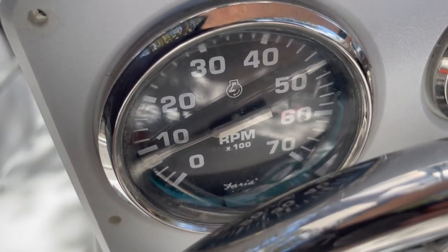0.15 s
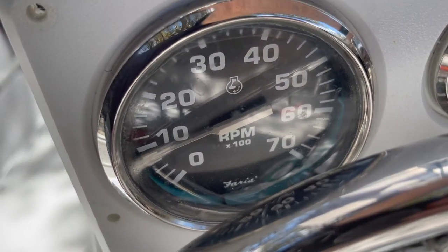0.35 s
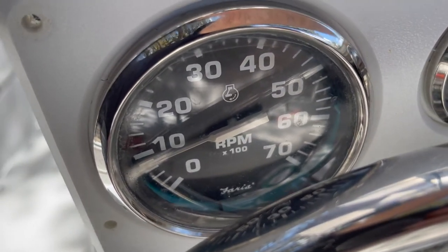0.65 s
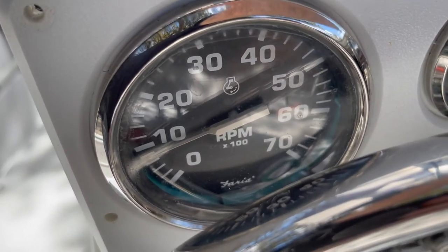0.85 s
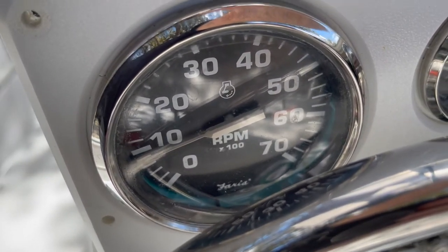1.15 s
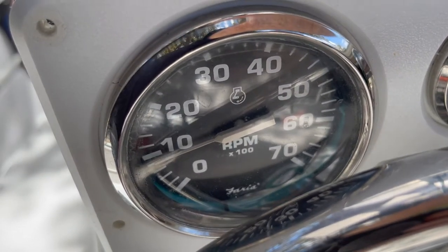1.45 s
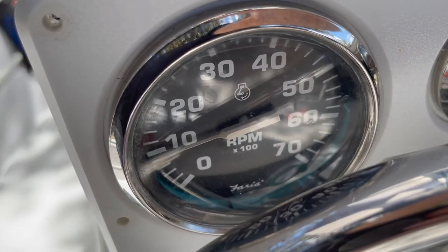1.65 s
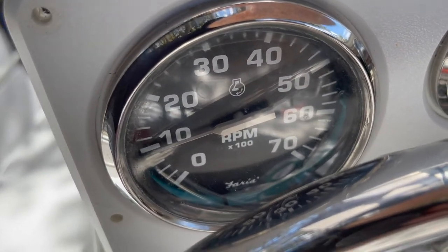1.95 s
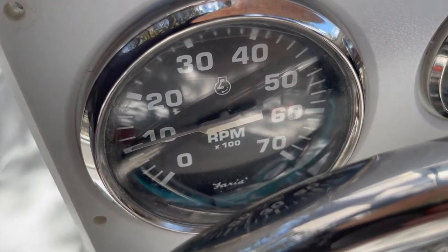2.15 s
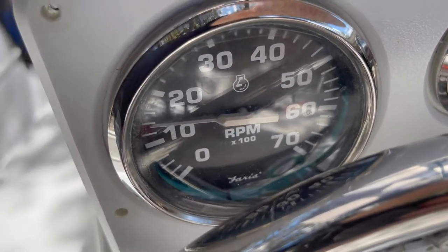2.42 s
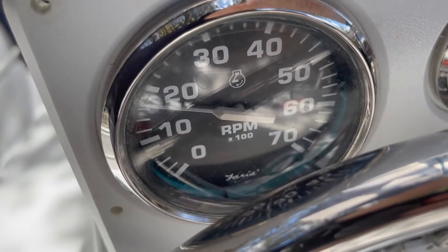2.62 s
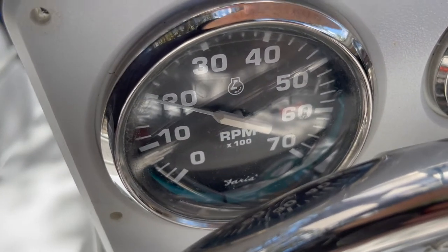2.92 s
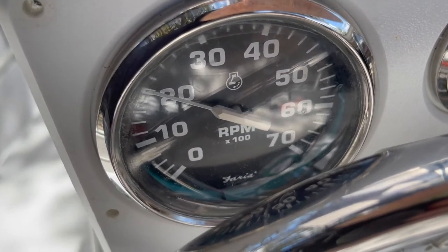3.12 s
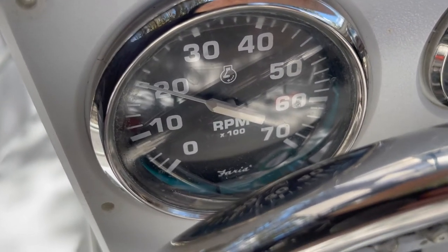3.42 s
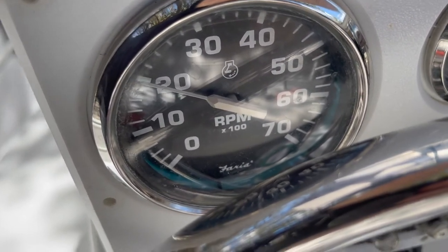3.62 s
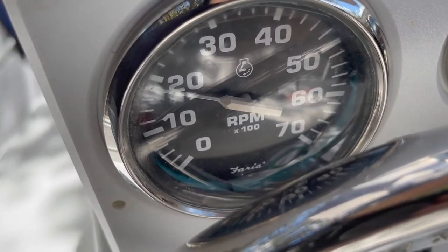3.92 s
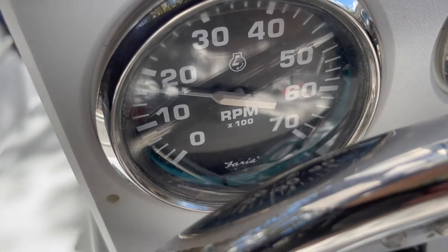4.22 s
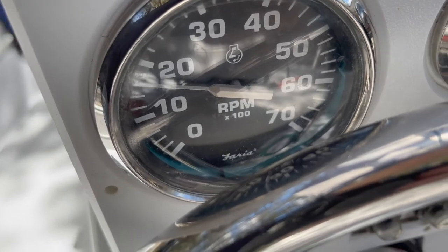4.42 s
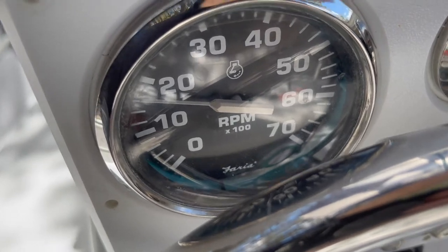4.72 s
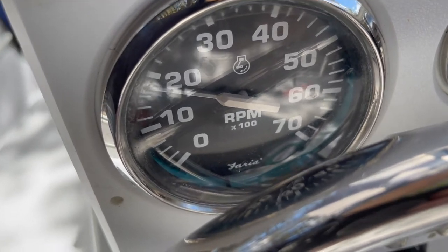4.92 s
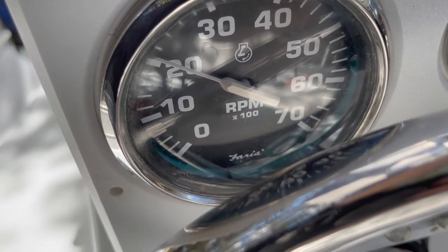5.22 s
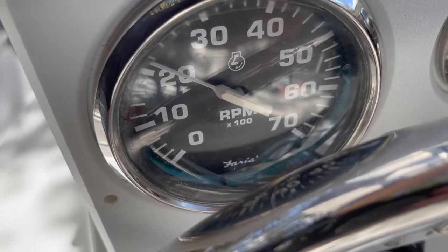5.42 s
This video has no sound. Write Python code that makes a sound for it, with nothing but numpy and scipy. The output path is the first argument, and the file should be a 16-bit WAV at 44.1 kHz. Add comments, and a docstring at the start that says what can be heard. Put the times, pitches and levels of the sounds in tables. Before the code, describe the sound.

A four-stroke outboard motor idles with a lumpy burble, then is revved twice into a booming growl while cooling water hisses and spits beside it.

```python
"""At the console of a boat: a four-stroke outboard idles, misses one firing and is revved twice.
Exhaust pulses boom through the leg and hull, built from multiples of the firing rate gliding through resonances.
Noise puffed by each firing burbles at the stern; ticks at fixed crank angles clatter under the cowl.
Intake air rushes and whistles as filtered noise, and short tones squeal and sag in pitch.
Beside the boat the cooling water hisses as fine spray, and larger drops spit in short bright bursts."""
import sys
import numpy as np
from scipy import signal
from scipy.fft import rfft, irfft, next_fast_len
from scipy.io import wavfile

SR = 44100
rng = np.random.default_rng(int(sys.argv[2]) if len(sys.argv) > 2 else 0)


def master(y):
    """Save y as 16-bit WAV."""
    cut = np.clip(np.atleast_2d(y).T, -1, 1)
    pcm = np.round(cut * 32767)  # scale
    wavfile.write(sys.argv[1], SR, pcm.astype(np.int16))


N = 245681
TIME = np.arange(N) / SR
SIZE = next_fast_len(N, True)
BINS = np.fft.rfftfreq(SIZE, 1 / SR)
CIRCLE = abs(np.fft.fftfreq(2 ** 14, 1 / SR))  # full frequency circle of the resonant bodies [Hz]
CRUISE_HZ = 50  # firing rate at which the cruise levels below hold

# engine speed, two firings a crank turn: (time [s], firing rate [Hz])
SPEED = [(0.0, 24.97), (0.25, 25.16), (0.53, 24.76), (0.8, 27.8), (1.4, 30.89), (1.89, 33.14), (2.0, 39.51),
         (2.1, 41.99), (2.25, 56.8), (2.38, 71.15), (2.51, 79.73), (2.6, 79.5), (2.72, 76.06), (3.0, 68.14),
         (3.25, 63.13), (3.58, 57.16), (3.77, 52.44), (4.05, 50.25), (4.37, 45.74), (4.56, 57),
         (4.67, 59.38), (4.82, 70.27), (4.95, 78.85), (5.12, 79.93), (5.42, 73.74), (5.57, 71.09)]
# first multiples of the firing rate in one exhaust pulse: (level [dB])
PULSE = [0, 0, -4.5, -3.5, -6.5]
# resonances of the cowl's panels: (centre [Hz], width [Hz], left lift [dB], right lift [dB])
PANELS = [(1028.7, 23.4, 13.6, 8), (1115, 27, 14.5, 8.5), (1210, 21, 11.8, -4), (1483, 25, 8.7, -28),
          (1711, 42, 13.3, 10), (1784, 55, 5, 9), (1873, 33, 16, 1), (1975, 67, 6.1, 6), (2350, 31, 4.2, 8),
          (2745, 14, 11, 8), (3147, 68, 10.24, 10.5), (3830, 24, 6.2, -21)]
# how exhaust, stern and hull, valve train, intake air and water follow the engine, before each part's trim:
# (level at cruise [dB], rise with speed [dB per octave], rise at open throttle [dB])
BOOM_LEVEL = (0, 4.84, 0.6)
STERN_LEVEL = (-36, 7.8, 0.99)
CLATTER_LEVEL = (-41, 5.85, 2.3)
RUSH_LEVEL = (-53, 3.3, 7.9)
WATER_LEVEL = (-45.5, 1.76, 1.2)


def amp(db):
    """Decibels to gain."""
    return 10 ** (np.asarray(db) / 20)


def unit(x):
    """Scales to rms 1."""
    return x / np.sqrt(np.mean(x ** 2) + 1e-20)


def curve(rows):
    """The second column of a time table at every sample."""
    times, values = np.transpose(rows)
    return np.interp(TIME, times, values)


def read(points, hz):
    """A spectrum table on a log-frequency axis."""
    f, value = np.transpose(points)
    return np.interp(np.log(hz + 1), np.log(f), value)


def smooth(x, seconds):
    """Moving sum under a bell window."""
    return signal.oaconvolve(x, signal.windows.hann(int(seconds * SR) | 1), "same")


def wander(seconds):
    """Slow random drift of rms 1."""
    return unit(smooth(rng.standard_normal(N), seconds))


def exhaust(firings, balance_db=0.5, spread=0.79):
    """The firings' lowest multiples glide through the resonances of the exhaust passage; one firing drops out."""
    # exhaust passage, whose ringing colours and delays each multiple: (frequency [Hz], gain [dB])
    pipe = [(20, -82), (27, -70), (32, -28), (44, -27.5), (55, -12), (65, -14.5), (78, -13), (100, -15),
            (120, -20.5), (142, -18.5), (163, -41.5), (182, -30), (203, -39.5), (228, -25), (255, -37.5),
            (285, -43.5), (315, -26), (345, -31.5), (400, -28.5), (750, -65.5)]
    # a firing that fails: (middle [s], share of the boom lost [0-1], half length [s])
    misfire = (1.883, 1, 0.017)
    uneven, uneven_s = 0.1, 0.07  # strokes differ at the slowest idle: rms share, bell length [s]

    passage, speed, boom = causal(read(pipe, CIRCLE)), curve(SPEED), np.zeros((2, N))
    for k, db in enumerate(PULSE, 1):
        hz = k * speed
        line = amp(db) * sweep(passage, hz) * np.exp(2j * np.pi * k * firings)
        # the microphone ports differ more at short wavelengths
        apart = np.exp(0.5j * spread * (hz / 320) ** 1.6)
        boom += np.array([line * apart, line / apart]).real

    idling = (speed.min() / speed) ** 2  # combustion evens out as the engine speeds up
    strokes = 1 + uneven * idling * wander(uneven_s)
    middle, lost, half = misfire
    firing_left = 1 - lost * np.exp(-((TIME - middle) / half) ** 4)
    balance = amp([[-balance_db], [balance_db]])
    return np.sqrt(2) * boom * strokes * firing_left * amp(loudness(BOOM_LEVEL)) * balance


def hull(firings, level_db=-2, rough=0.32, scatter=1.62, fade_db=0.1, count=30):
    """Higher multiples glide through the resonances of hull and cowl and growl; each arrives by its own path."""
    # broad response of the hull: (frequency [Hz], gain [dB])
    hull_slope = [(140, 8.5), (165, 5.5), (200, -3), (280, -2), (350, 2), (470, -5.5), (530, -12.5),
                  (700, -10.5), (900, -27.5), (1400, -16.5), (1850, -28.5), (2400, -14.5)]
    # resonances of the hull: (centre [Hz], width [Hz], left lift [dB], right lift [dB])
    hull_modes = [(227.8, 13.6, 11, 13), (319, 16, 1, -12), (347, 20, 4.5, 8), (394.9, 11, 4, 11.5),
                  (462.7, 70, 2.5, 9), (603, 82, 10.5, 0.5), (835, 33, 3, 13)]

    left, right = causal(colour(CIRCLE, hull_slope, hull_modes + PANELS))
    speed, out = curve(SPEED), np.zeros((2, N))
    waver = wander(0.064) + 1j * wander(0.029)
    for k in range(len(PULSE) + 1, count):
        hz = k * speed
        growl = 1 + rough * np.roll(waver, rng.integers(N))
        line = np.exp(2j * np.pi * (k * firings + rng.random())) * growl
        apart = np.exp(1j * scatter * rng.standard_normal() * np.minimum(hz / 600, 2) ** 2)
        # gentle idling pulses hold less of the highest multiples
        soft_db = -fade_db * max(k - count / 2, 0) * speed.max() / speed
        pair = np.array([line * sweep(left, hz), line * sweep(right, hz) * apart]).real
        out += pair * amp(soft_db)
    return out * amp(loudness(STERN_LEVEL) + level_db)


def burble(firings, level_db=6, swell_db=0.5, idle_db=3):
    """Each puff of gas churns the water at the stern; it grows louder with speed, idle_db flattening the rise."""
    # gas bubbling out: (frequency [Hz], relative level [dB per Hz])
    bubbling = [(15, -19), (35, -4), (70, 11), (130, 10), (180, 2.5), (280, -1), (370, 4), (470, 1.5),
                (540, -0.5), (680, 0), (850, -11.5), (1500, -31)]
    gas = puffs(firings, depth=2.6, lag=-0.077, length=0.013)
    churn = rng.standard_normal((2, N)) * gas * amp(swell_db * wander(0.071))
    speed = curve(SPEED)
    slow = 1 - 2 * speed / speed.max()
    return unit(ports(*churn, read(bubbling, BINS))) * amp(loudness(STERN_LEVEL) + level_db + idle_db * slow)


def clatter(firings, regular=0.15, jitter_s=0.00003, level_db=2.0, count=48):
    """Valves and gears tick at the same crank angles in every turn, over a loose rattle."""
    # engine cowl: (frequency [Hz], relative level [dB per Hz])
    cowl = [(300, -7.5), (650, -4.5), (900, 3.5), (1400, 0), (2000, -4.5), (2600, -9), (3300, -11),
            (4500, -27), (9000, -41)]
    sides = []
    for side in range(2):
        angles, signs = rng.random(count), rng.choice([-1, 1], count)
        turns = np.arange(firings[-1] // 2 + 1)[:, None]
        marks = 2 * (turns + angles)  # counted in firings
        heard = (marks > firings[0]) & (marks < firings[-1])
        times = np.interp(marks[heard], firings, TIME) + jitter_s * rng.standard_normal(heard.sum())
        sizes = (signs * np.ones_like(marks))[heard]
        # more ticks a second at speed: weaken each to hold the power level
        ticks = clicks(np.clip(times, 0, TIME[-1]), sizes) / np.sqrt(curve(SPEED))
        rattle = rng.standard_normal(N)
        sides.append(np.sqrt(regular) * unit(ticks) + np.sqrt(1 - regular) * rattle)
    drive = np.array(sides) * puffs(firings, depth=1.0, lag=0.028, length=0.045)
    return unit(body(ports(*drive), cowl, PANELS)) * amp(loudness(CLATTER_LEVEL) + level_db)


def rush(level_db=5, balance_db=1.4, flutter_db=1.57):
    """Air drawn into the engine, louder with speed and with an open throttle."""
    # rush of air: (frequency [Hz], relative level [dB per Hz])
    air_slope = [(1200, -5), (2500, 3.5), (3500, -0.5), (5000, 4), (5900, 5.5), (6800, -1.5), (8500, -5),
                 (13000, -24)]
    # resonances of the intake: (centre [Hz], width [Hz], left lift [dB], right lift [dB])
    intake = [(2407, 24, 13.5, -7), (2664, 110, 10.5, -11), (3270, 47, 5, -4), (3520, 16, 16, 11),
              (3900, 45, 6.5, 8)]
    air = rng.standard_normal((2, N)) * amp(flutter_db * wander(0.033))
    coloured = unit(ports(*air, colour(BINS, air_slope, intake)))
    return coloured * amp(loudness(RUSH_LEVEL) + level_db) * amp([[balance_db], [-balance_db]])


def whistle(balance_db=2, flutter_db=3):
    """Air squeezing past the throttle sings in one narrow resonance that swells, flutters and fades."""
    # (middle [s], length [s], pitch [Hz], half width at -6 dB [Hz], level before flutter and balance [dB])
    whistles = [(0.35, 0.25, 2720, 17, -53), (1.306, 1.9, 2760, 6.1, -58.5), (1.98, 0.24, 2730, 50, -47.5),
                (4.55, 0.86, 2820, 37, -47.5)]
    out = np.zeros((2, N))
    for middle, length, hz, width_hz, db in whistles:
        peak_db = -20 * np.log10(1 + ((BINS - hz) / width_hz) ** 2)
        swell = np.cos(np.pi * np.clip((TIME - middle) / length, -0.5, 0.5))
        out += amp(db) * swell * unit(ports(*rng.standard_normal((2, N)), peak_db))
    return out * unit(amp(flutter_db * wander(0.099))) * amp([[balance_db], [-balance_db]])


def squeals(rough=0.62, balance_db=2):
    """Short tones that sag in pitch, roughened by a random wobble of phase."""
    # (start [s], length [s], first pitch [Hz], last pitch [Hz], level before balance [dB])
    falls = [(3.026, .13, 1236, 1203, -40), (4.278, .16, 2780, 2451, -49), (5.35, 0.125, 1890, 1767, -44)]
    out = np.zeros(N)
    for start, length, first_hz, last_hz, db in falls:
        progress = np.clip((TIME - start) / length, 0, 1)
        cycles = np.cumsum(first_hz + (last_hz - first_hz) * progress) / SR
        tone = np.sin(2 * np.pi * cycles + rough * wander(0.015))
        out += amp(db) * np.sin(np.pi * progress) * tone
    return np.sqrt(2) * out * amp([[balance_db], [-balance_db]])


def water(level_db=3.5, flicker_db=1.3):
    """The cooling stream breaks into fine spray: flickering noise, a little louder with speed."""
    # hiss of water: (frequency [Hz], relative level [dB per Hz])
    hiss = [(3500, -64), (5500, -5.5), (7000, -4), (8500, -2.5), (10000, 0.5), (10800, 1.5), (11400, 4),
            (12000, -7.5), (13000, -7.5)]
    spray = rng.standard_normal((2, N)) * amp(flicker_db * wander(0.057))
    return unit(ports(*spray, read(hiss, BINS))) * amp(loudness(WATER_LEVEL) + level_db)


def spits(level_db=-6, rise=0.002, decay=0.022, width_octaves=0.33):
    """Larger drops slap the surface: short bright bursts."""
    # drops that slap: (time [s], peak level before the trim level_db [dB], centre [Hz])
    drops = [(0.0662, -38, 9000), (0.2139, -37, 4800), (0.609, -43, 4350), (0.658, -39, 8560),
             (0.9416, -39, 4370), (0.9797, -37.5, 6070), (1.1623, -37.5, 5400), (1.4519, -38, 7710),
             (1.6094, -44, 8060), (1.7998, -45, 8680), (1.8896, -37, 8980)]
    out = np.zeros((2, N))
    for start, db, hz in drops:
        age = np.maximum(TIME - start, 0)
        shape = (1 - np.exp(-age / rise)) * np.exp(-np.minimum(age / decay, 40))
        band_db = -np.minimum(2 * (np.log2((BINS + 1) / hz) / width_octaves) ** 2, 60)
        burst = unit(ports(*rng.standard_normal((2, N)), band_db))
        out += amp(db + level_db) * shape / shape.max() * burst
    return out


def loudness(law):
    """A part's level in dB: it grows with speed and with the throttle."""
    # the throttle starts part open, shuts, then is opened twice and eased back: (time [s], opening [0-1])
    throttle = [(0, 0.47), (.3, 0), (1.75, 0.02), (2.03, 0.75), (2.3, 1), (2.5, 0.67), (2.8, 0), (3.5, 0),
                (4.25, 0.33), (4.65, 0.68), (4.92, 0.99), (5.3, 0.17), (5.57, .05)]
    cruise_db, octave_db, throttle_db = law
    octaves = np.log2(curve(SPEED) / CRUISE_HZ)
    return cruise_db + octave_db * octaves + throttle_db * np.clip(curve(throttle), 0, 1)


def puffs(firings, depth, lag, length):
    """A swell after every firing (lag in firings, length in s); swells run together as the engine speeds up."""
    age = ((firings - lag) % 1) / curve(SPEED)
    return unit(1 + depth * np.exp(-age / length))


def clicks(times, sizes):
    """Impulses at exact times, each shared between two samples."""
    at, part = np.divmod(times * SR, 1)
    at = at.astype(int)
    early = np.bincount(at, sizes * (1 - part), N + 1)
    late = np.bincount(at + 1, sizes * part, N + 1)
    return (early + late)[:N]


def colour(hz, slope, modes):
    """Left and right dB of a broad slope lifted by resonances."""
    lifts = sum(np.array([[left], [right]]) / (1 + (2 * (hz - f) / width) ** 2)
                for f, width, left, right in modes)
    return read(slope, hz) + lifts


def causal(db):
    """The minimum-phase response that rings only after the blow, from dB on the full frequency circle."""
    return np.exp(np.conj(signal.hilbert(np.log(amp(db)))))


def sweep(response, hz):
    """A complex response read along a moving frequency."""
    half = len(CIRCLE) // 2
    return np.interp(hz, CIRCLE[:half], response[:half])


def body(x, slope, modes):
    """Rings x through a resonant body, one response for each port."""
    ring = np.fft.ifft(causal(colour(CIRCLE, slope, modes))).real[:, :len(CIRCLE) // 2]
    return signal.fftconvolve(x, ring, axes=1)[:, :N]


def ports(a, b, db=0):
    """Two unrelated signals become a partly alike left and right microphone port, coloured by db."""
    # how alike the ports are: (frequency [Hz], likeness [0-1])
    likeness = [(150, 0.95), (300, 0.43), (500, 0.12), (1500, 0.44), (3000, 0.48), (7000, 0.28), (8300, 1),
                (13000, 1)]
    # how far left leads right: (frequency [Hz], phase [rad])
    lead = [(100, 0), (330, .5), (450, 0), (560, 2), (900, 2), (1100, 0), (1650, -1.1), (3000, 1),
            (6200, .3), (7500, 1), (8550, 0), (10200, -3.14), (11900, -6.28), (13000, -7.4)]
    same = np.clip(read(likeness, BINS), 0, 1)
    left, other = rfft(a, SIZE), rfft(b, SIZE)
    right = (same * left + np.sqrt(1 - same ** 2) * other) * np.exp(-1j * read(lead, BINS))
    return irfft(np.array([left, right]) * amp(db), SIZE)[:, :N]


def scene(start=0.0304):
    """Pulses, puffs and ticks follow one running count of firings; water and drops lie beside the engine."""
    firings = start + np.cumsum(curve(SPEED)) / SR
    engine = exhaust(firings) + hull(firings) + burble(firings) + clatter(firings)
    air = rush() + whistle() + squeals()
    return engine + air + water() + spits()


def record(dry):
    """The recorder's band limit at 13 kHz, with a few milliseconds of fade at each end."""
    faded = dry * signal.windows.tukey(N, 0.002)
    lowpass = signal.firwin(511, 13000, window=("kaiser", 9), fs=SR)
    return signal.oaconvolve(faded, lowpass[None], "same")


dry = scene()
out = record(dry)
master(out)
```